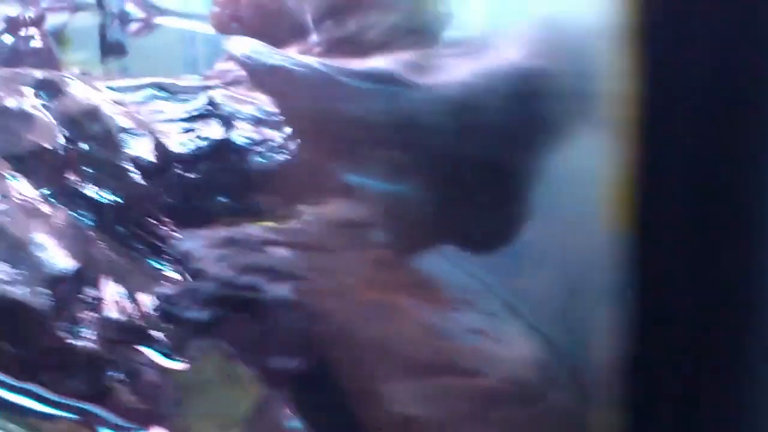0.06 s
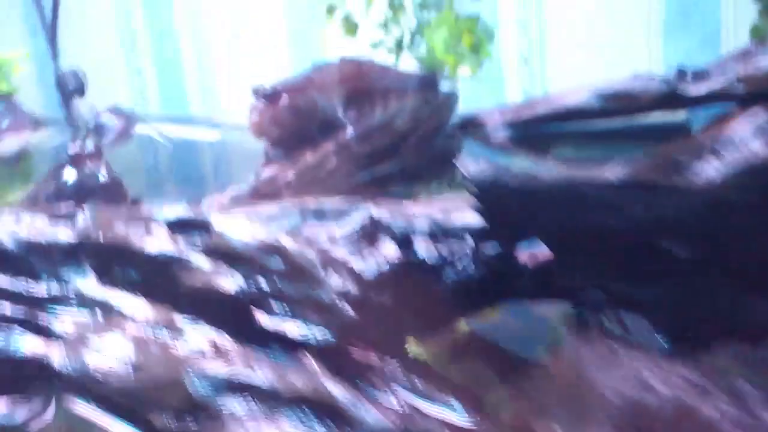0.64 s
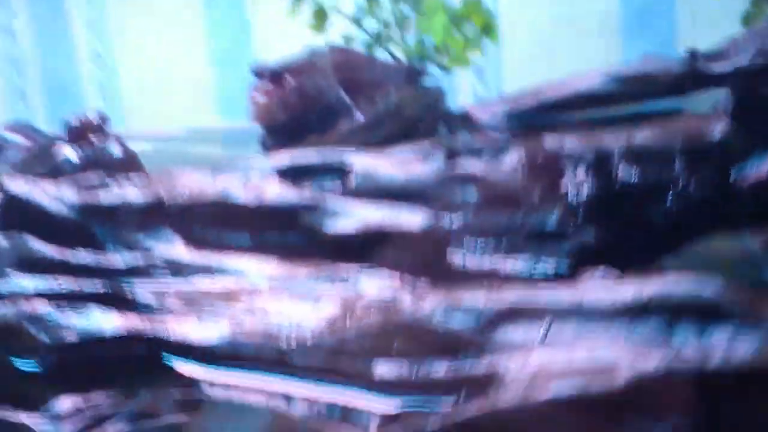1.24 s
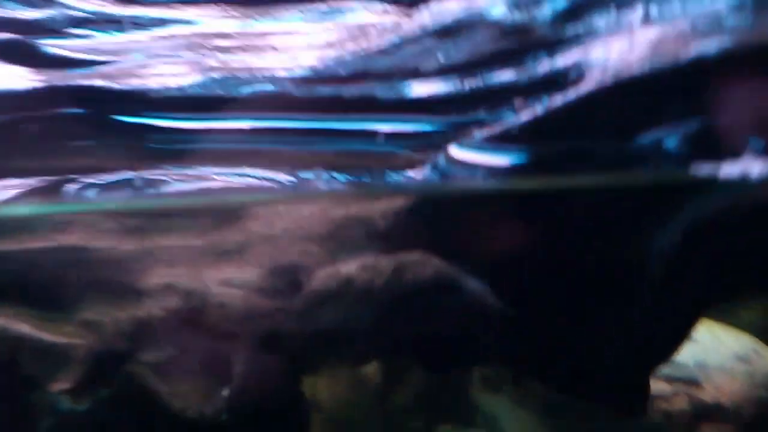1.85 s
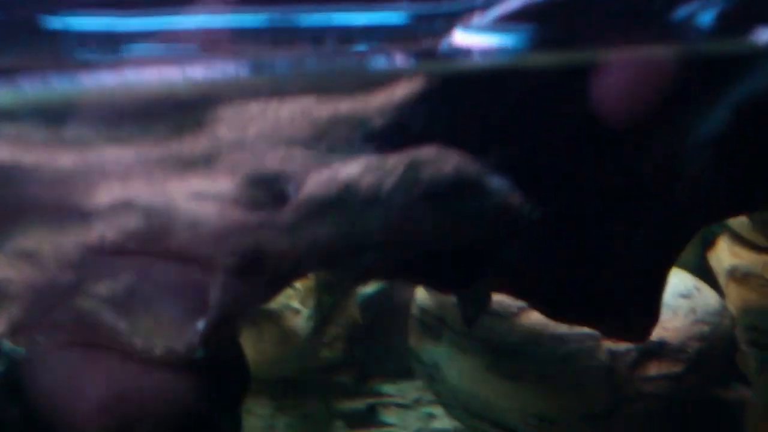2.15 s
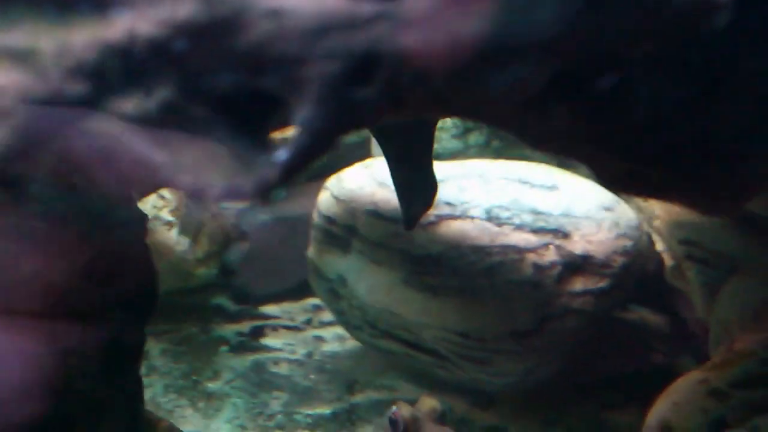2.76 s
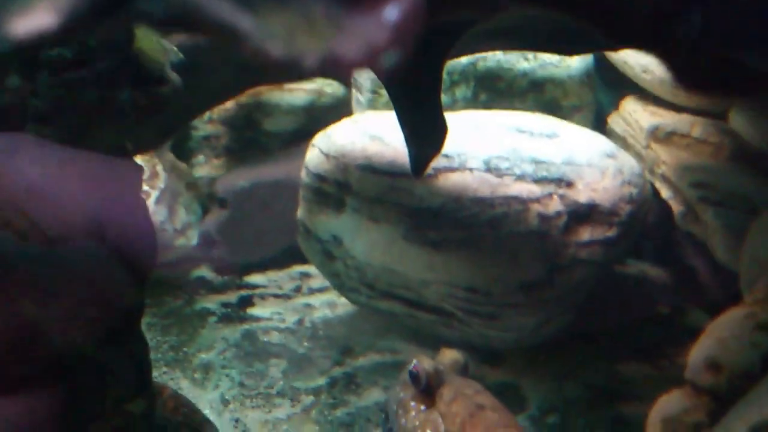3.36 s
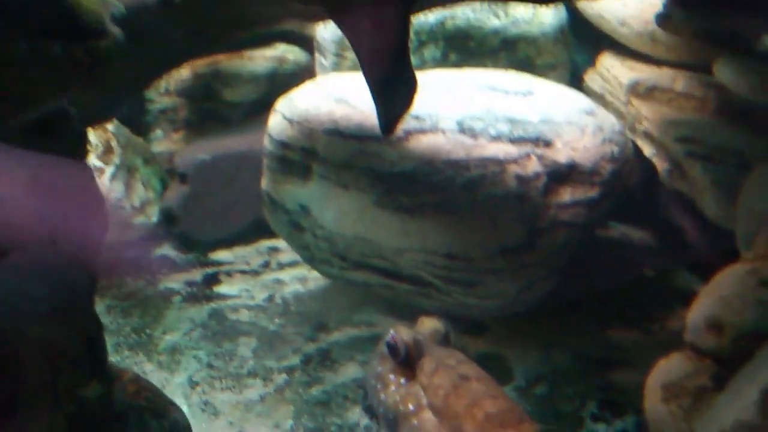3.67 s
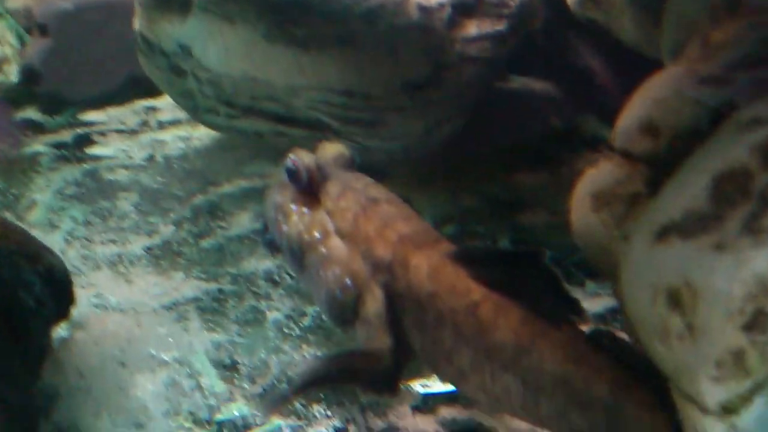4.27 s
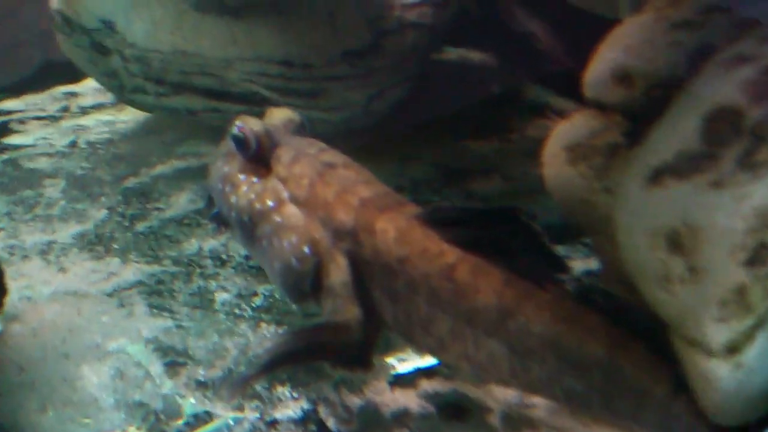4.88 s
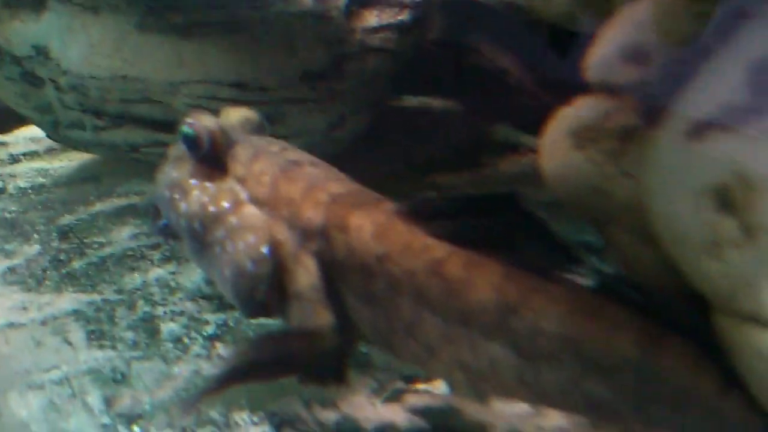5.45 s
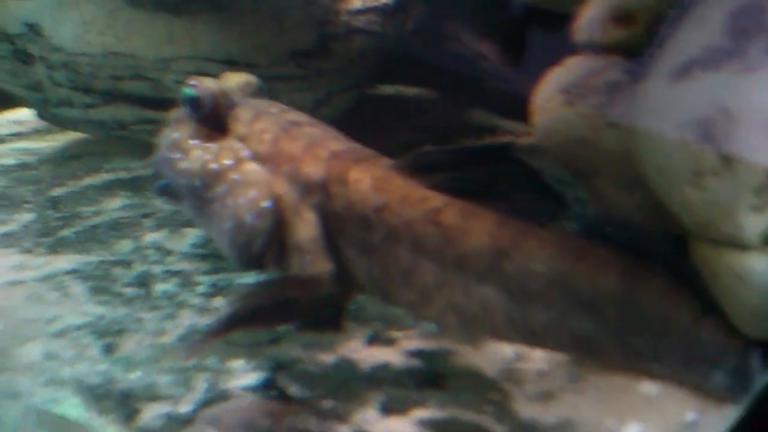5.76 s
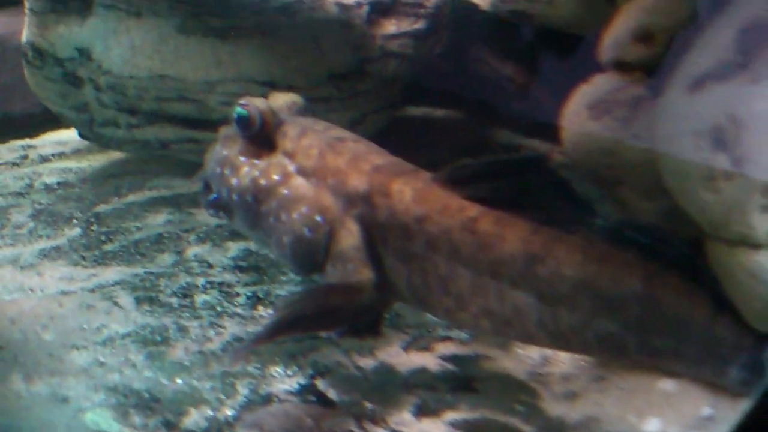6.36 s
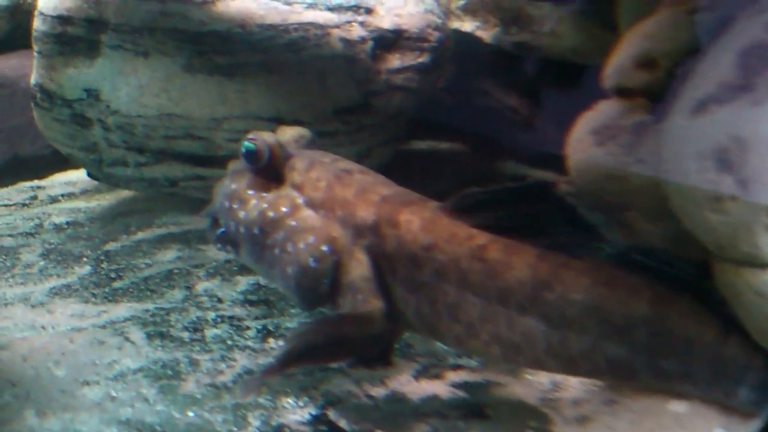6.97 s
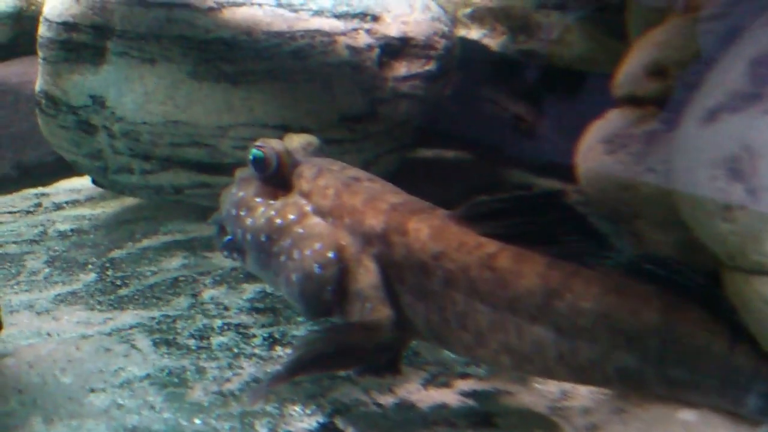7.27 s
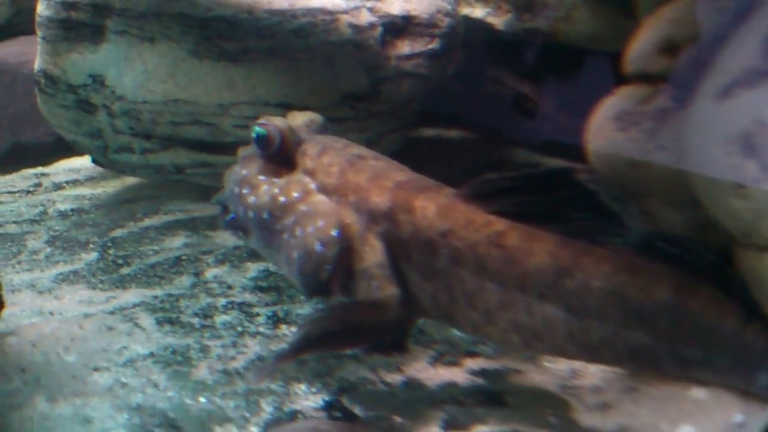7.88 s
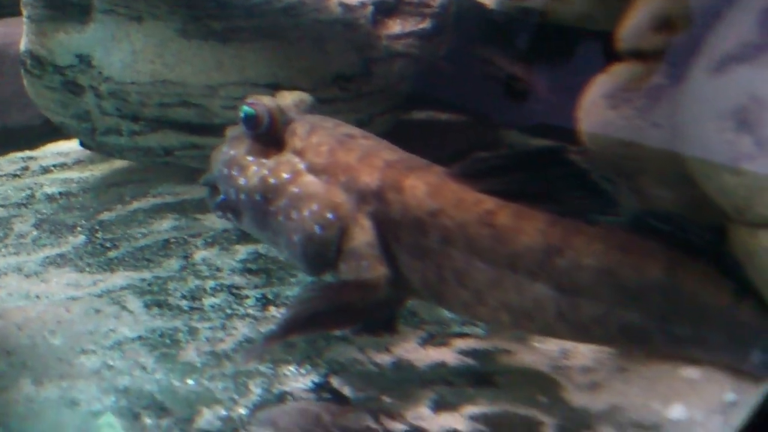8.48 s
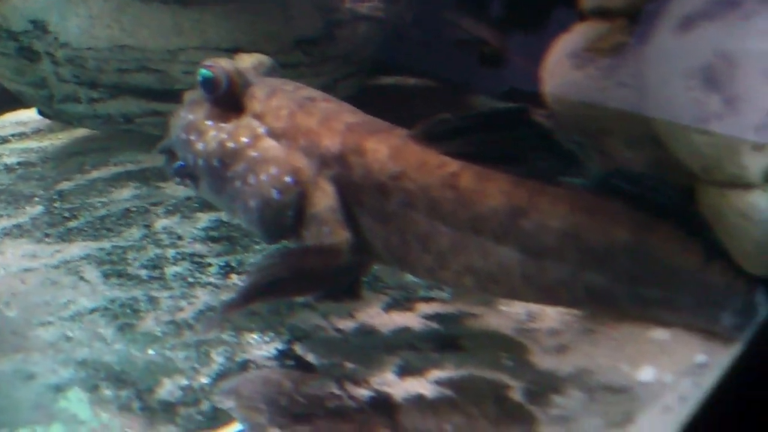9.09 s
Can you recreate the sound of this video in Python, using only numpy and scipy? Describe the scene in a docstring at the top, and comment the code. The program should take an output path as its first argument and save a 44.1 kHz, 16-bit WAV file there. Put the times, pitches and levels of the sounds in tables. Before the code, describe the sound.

A low, quiet aquarium pump hum and a soft rush run throughout in a quiet room, heard from a hand-held camera. Their tone shifts gradually until about 5.5 seconds as the microphones move from the tank's rim to the glass. A thin whine swells and fades at the start, near 5 seconds and near 8. The camera's motors add a faint high whirr over steady hiss. Tiny plastic ticks are scattered all along, mostly on the left, with a sharper click at 1.4 seconds and brief finger rubs and snaps near 0.2, 1.4 and 2.4. A rub and three light, dull bumps come between 4.4 and 4.7 seconds. At about 5.1 one hard, dry knock hits the case close to the left microphone, by far the loudest sound. From 6.3 to 8 seconds the grip gives short, soft creaks, and the hum continues until about 9.

```python
"""A low pump hum and a soft rush in a quiet room, heard from a hand-held camera at an aquarium's rim.
As the microphones move down to the glass, each multiple of the mains fades or grows with its standing
wave. A thin whine swells and fades three times. The camera's own motors whirr faintly throughout.
Fingers tick, rub and creak on the case; at about 5 s it knocks hard, close to the left microphone."""
import sys
import numpy as np
from scipy import signal
from scipy.fft import rfft, irfft
from scipy.io import wavfile
from scipy.ndimage import uniform_filter1d, map_coordinates

SR = 44100
rng = np.random.default_rng(int(sys.argv[2]) if len(sys.argv) > 2 else 0)


def transcribe(signal):
    """Save signal, clipped to [-1, 1], as a 16-bit WAV file at the path in sys.argv[1]."""
    frames = np.atleast_2d(signal).T
    limited = np.clip(frames, -1, 1)
    pcm = np.round(limited * 32767).astype(np.int16)
    wavfile.write(sys.argv[1], SR, pcm)


N = 407043
T = np.arange(N) / SR
MAINS_HZ, SOUND_M_S, TOP_HZ = 49.98, 343, 15800

# The microphones' path from rim to glass. Each row: time in seconds, place in metres.
MIC_PATH = [(0, 0), (1.5, 0.03), (3.2, 0.047), (5.6, 0.12), (9.2, 0.12)]
# The pump's standing waves. Each row: multiple of the mains, crest level in dB, place of a node in
# metres, left minus right in dB.
HUM_WAVES = [(2, -65, 0.42, 3.5), (3, -62.5, -0.43, 2.5), (4, -62, -0.0038, 9), (5, -72.5, -0.15, 5),
             (6, -63, 0.12, -1.5), (7, -62, 0.051, 6.5), (8, -68, 0.019, 3.5), (9, -79, 0.15, 3),
             (10, -79.5, -.09, 9), (11, -74, 0.15, 1), (12, -73.5, 0.22, 5), (13, -78.5, 0.14, 16),
             (14, -78, 0.033, 0), (15, -75, 0.038, 5), (16, -74.5, 0.021, 7.5), (17, -80, 0.071, 5),
             (20, -87.5, 0.013, 3), (21, -84, 0.051, 1), (23, -82, 0.1, -1.5), (25, -82.5, 0.042, 5),
             (26, -88, 0.133, 2), (27, -85.5, 0.091, 3)]
# Tones of the pump housing. Each row: multiple of the mains, left and right level in dB.
WHINE_TONES = [(32, -83.5, -86), (33, -81, -76.5), (35, -91, -87)]
# Resonances. Each row: centre in Hz, width in Hz, left and right level in dB, throb depth from 0 to 1.
PUMP_HOUSING = [(1610, 110, -78, -78, 1)]
MOTOR_BANDS = [(6410, 400, -74.5, -77, 0.27), (9750, 390, -78, -93, 0.6), (8800, 3700, -73, -92, 0.8)]
FOCUS_BANDS = [(354, 130, -73, -70.5, 0.98), (2630, 670, -69, -72, 0.42), (5720, 220, -88, -77, .3),
               (8780, 170, -78.5, -98, .6)]
FOCUS_WHISTLE = [(6200, 130, -84, -77, 0.2)]
# Smooth swells and dips. Each row: centre in seconds, width in seconds, gain in dB.
WHINE_SWELLS = [(.3, 1.1, 3.5), (4.8, 1.35, 3), (8.1, 1.6, -0.5)]
RUSH_SWELLS = [(2.85, 0.27, 0.5), (3.55, 0.12, 0.8), (6.52, 0.2, 3)]
WHIRR_SWELLS = [(1.7, .22, -1.5), (4.35, .45, 2), (5.2, .1, -2), (5.95, .2, 1)]
# Colours of the noises. Each row: frequency in Hz, relative level in dB.
RIM_COLOUR = [(20, 0.5), (70, 3.5), (140, -1.5), (230, 0.5), (330, 0.5), (410, -8), (620, -7), (760, -12.5),
              (900, -10), (1150, -12.5), (1500, -12), (2600, -19), (5000, -29)]
GLASS_COLOUR = [(20, 2), (70, 2.5), (160, 0), (340, 2), (520, -4), (780, -8.5), (1150, -10.5),
                (1420, -15.5), (1680, -14.5), (2600, -15), (5000, -37)]
HISS_COLOUR = [(100, 13), (2000, 0), (4500, 3), (8000, 1.5), (12000, -1), (16000, -2)]
RUB_LEFT_COLOUR = [(500, -15), (2600, -4), (3600, -5.5), (5000, 0), (6200, 2), (8200, -3), (9200, 4.5),
                   (10100, 5), (11200, -3), (12200, -7), (14000, -7), (15500, -17)]
RUB_RIGHT_COLOUR = [(500, -30), (1500, 9), (2500, 3), (3800, 9), (5200, 16), (6500, 5), (7800, -3),
                    (15500, -6)]
CHATTER_COLOUR = [(500, 0), (2500, 2), (6000, -2), (9000, 2), (12000, -2), (15500, -1)]
# Balance of the rush at each place. Each row: frequency in Hz, left minus right in dB.
RIM_BALANCE = [(60, 1), (300, -1), (480, 2), (700, -3), (1000, 2), (4000, -3.5)]
GLASS_BALANCE = [(60, -1), (250, 2), (450, 7), (850, 1), (1200, 6), (1700, -3.5), (2500, 3), (4000, -9)]
# How alike the rush is at the two microphones. Each row: frequency in Hz, coherence from 0 to 1.
RUSH_COHERENCE = [(30, 0.34), (130, 0.7), (300, 0.83), (640, 0.67), (1400, 0), (3000, 0.08)]
# The camera motor's speed. Each row: time in seconds, pitch in Hz (used relative to its mean).
WHIRR_PITCH = [(0, 6330), (1.1, 6290), (1.25, 6550), (1.5, 6340), (2.8, 6330), (3.2, 6440), (4.9, 6380),
               (5.4, 6480), (9.2, 6430)]
# Modes of the camera's body. Each row: frequency in Hz, t60 in seconds, left and right gain in dB.
TICK_MODES = [(3400, 0.0045, -13, -32), (5600, 0.0032, -21, -30), (8100, 0.004, -11, -42),
              (9400, 0.004, 3.5, -42), (10500, 0.0036, -4, -42)]
SEAM_MODES = [(1380, 0.009, -6, -9), (3080, 0.0073, -9, -11), (3660, .01, -8, -8), (4320, 0.0082, -5, -9),
              (6440, 0.0065, -13, -7), (9700, .005, 5, -25)]
CASE_MODES = [(131, 0.1, -34, -30), (193, 0.073, -23, -40), (253, 0.094, -23, -40), (355, 0.019, -12, -38),
              (491, 0.027, -12, -36), (602, 0.025, -10.5, -20), (904, 0.0087, -10.5, -24),
              (1150, 0.0093, -13.5, -28), (1377, 0.021, -23, -20.5), (2070, 0.013, -8.5, -11.5),
              (2580, 0.0058, -6, -24), (3900, 0.005, -3.5, -15), (4600, 0.0055, -10.5, -13),
              (5410, 0.005, -11, -11), (6200, 0.0058, -20, -13.5), (6900, 0.0065, -10, -33.7),
              (7970, 0.0033, -0.7, -35.2), (9050, 0.0054, -2, -32.4), (9800, 0.0036, -3.5, -28.4),
              (11200, 0.0061, -7.5, -29.9), (12050, 0.004, -11, -22.5), (14552, 0.0034, -7, -24)]
GRIP_MODES = [(330, 0.011, -6, -12), (780, 0.013, -3.5, -36), (1030, 0.0093, -2, -23),
              (2020, 0.0035, -1, -10), (3000, .004, -17, -13)]
# Clear plastic ticks. Each row: start in seconds, gain in dB.
CLEAR_TICKS = [(0.074, -47), (1.035, -47), (1.3570, -21), (1.3578, -38), (2.232, -46), (2.2588, -41),
               (2.318, -44), (2.961, -48), (4.243, -48), (4.3735, -47), (4.458, -40), (4.875, -47),
               (6.1567, -44), (6.797, -46), (7.439, -47), (8.081, -47), (8.134, -47), (8.7229, -45)]
# Finger rubs. Each row: start in seconds, length in seconds, gain in dB, tilt in dB per octave.
FINGER_RUBS = [(0.179, 0.021, -51, 4), (0.371, 0.39, -64, -2.5), (1.383, 0.084, -59.5, 12),
               (1.422, 0.034, -55.5, 13), (2.29, .13, -61.5, 3), (2.391, 0.031, -54.5, 2),
               (2.798, .014, -57.5, -3), (4.38, 0.093, -50.5, -1), (5.505, 0.44, -65, 7)]
# Snaps and creaks. Each row: start in seconds, gain in dB, hardness as a low-pass cutoff in Hz.
SEAM_SNAPS = [(.1822, -41, 14000), (.189, -52, 12000), (1.4474, -39.5, 2800), (2.414, -38.5, 2200)]
GRIP_CREAKS = [(4.543, -39.5, 1500), (4.664, -39, 2400), (4.7258, -39, 2800), (6.3589, -34.5, 4200),
               (6.5635, -40, 1300), (6.6553, -39.5, 1300), (6.7845, -37, 1700), (7.008, -39.5, 2000),
               (7.1547, -37.5, 1500), (7.613, -39, 1400), (7.6362, -41, 1200), (7.944, -36.5, 2600),
               (7.994, -40, 1700), (8.002, -42, 1900)]
# Blows on the case. Each row: start in seconds, gain in dB, extra on the right in dB, low-pass in Hz.
CASE_BLOWS = [(1.3572, -42, -2, 700), (4.543, -37, 7, 14000), (4.5436, -33, 13, 450),
              (4.6645, -28.5, 3, 650), (4.7258, -29, 3, 750), (5.1489, 1.5, -6, 15500),
              (5.1513, -20.5, 3, 12000), (5.1551, -7.5, -6.5, 320), (5.1551, -25, -9, 3500)]


def undb(db):
    """Decibels to gain."""
    return 10 ** (np.asarray(db) / 20)


def curve(rows):
    """Rows of seconds and value, joined by straight lines."""
    return np.interp(T, *np.transpose(rows))


def across(rows):
    """Rows of Hz and value, joined on a log-frequency axis for every bin."""
    hz, value = np.transpose(rows)
    return np.interp(np.log(np.arange(N // 2 + 1) * SR / N + 1), np.log(hz), value)


def unit(x):
    """Scale to rms 1."""
    return x / np.sqrt(np.mean(x ** 2))


def noise(gain):
    """Noise of rms 1, shaped by a gain for every bin."""
    return unit(irfft(rfft(rng.standard_normal(N)) * gain, N))


def walk(rate):
    """Random levels held 1 / rate seconds and smoothed twice; spread near 1."""
    hold = int(SR / rate)
    steps = np.repeat(rng.standard_normal(N // hold + 1), hold)
    return 1.3 * uniform_filter1d(uniform_filter1d(steps, hold), hold)[:N]


def bump(s, width_s):
    """A smooth rise and fall, 1 at time s."""
    return np.exp(-((T - s) / width_s) ** 2)


def cut(x, hz, kind):
    """Two-pole low-pass or high-pass."""
    return signal.sosfilt(signal.butter(2, hz, kind, fs=SR, output="sos"), x)


def add(out, s, sound):
    """Mix a short stereo sound in at time s."""
    start = int(s * SR)
    out[:, start:start + sound.shape[1]] += sound[:, :N - start]


def pump_hum(place_m, node_db=-29, sway_db=0.9, rattle_db=2.0, jitter_s=6e-5, skew_rad=0.31):
    """Mains harmonics stand in the room; each fades as the microphones near one of its nodes."""
    out = np.zeros((2, N))
    for multiple, crest_db, node_m, balance_db in HUM_WAVES:
        hz = multiple * MAINS_HZ
        wave = np.sin(2 * np.pi * hz * (place_m - node_m) / SOUND_M_S)
        level = undb(crest_db) * np.hypot(wave, undb(node_db))
        level *= undb(sway_db * np.sqrt(hz / 400) * walk(2.01))  # the hand sways; short waves vary most
        level *= undb(rattle_db * hz / 800 * walk(18))  # uneven rattle roughens the high harmonics
        phase = 2 * np.pi * (hz * (T + jitter_s * walk(25)) + rng.random())
        out[0] += level * undb(balance_db / 2) * np.cos(phase + skew_rad * rng.standard_normal())
        out[1] += level * undb(-balance_db / 2) * np.cos(phase)
    return np.sqrt(2) * out


def whirr(resonances, speed=1, drift=0.007, drift_rate=3.0, throb_hz=50, flutter_db=1.3):
    """A small motor's noise in the resonances of its housing, throbbing and wavering in pitch."""
    out, bin_hz = 0, np.arange(N // 2 + 1) * SR / N
    beat = np.cos(2 * np.pi * throb_hz * T)
    position = np.cumsum(speed + drift * walk(drift_rate))  # noise read faster sounds higher
    for hz, width, left, right, throb in resonances:
        shape = 1 / (1 + ((bin_hz - hz) / (width / np.sqrt(2))) ** 2)
        band = np.array([map_coordinates(noise(shape), [position], mode="mirror") for _ in range(2)])
        flutter = undb(flutter_db * walk(25))
        out += undb([[left], [right]]) * unit(band * (1 + throb * beat)) * flutter
    return out


def pump_whine():
    """Mains harmonics sing in the pump housing; the thin whine swells and fades three times."""
    tones = 0
    for multiple, left, right in WHINE_TONES:
        phase = 2 * np.pi * (multiple * MAINS_HZ * T + rng.random((2, 1)))
        tones += undb([[left], [right]]) * np.cos(phase)
    swell = sum(undb(db) * bump(s, width_s) for s, width_s, db in WHINE_SWELLS)
    return swell * (np.sqrt(2) * tones + whirr(PUMP_HOUSING, drift=0.00417))


def rush(colour, balance, flutter_db=0.5):
    """Broad noise of running equipment at one spot; its long waves reach both microphones much alike."""
    coherence = across(RUSH_COHERENCE)
    common, left, right = rfft(rng.standard_normal((3, N)))
    pair = np.sqrt(coherence) * common + np.sqrt(1 - coherence) * np.array([left, right])
    gain = undb(across(colour) + np.array([[1], [-1]]) * across(balance) / 2)
    return unit(irfft(pair * gain, N)) * undb(flutter_db * walk(5.4))


def room_rush(place_m, rim_m=0.023, glass_m=0.118, rim_db=-61, glass_db=-58.5):
    """The rush changes colour on the way from the rim to the glass, with a few brief swells."""
    near_glass = np.clip((place_m - rim_m) / (glass_m - rim_m), 0, 1)
    at_rim = np.sqrt(1 - near_glass) * undb(rim_db) * rush(RIM_COLOUR, RIM_BALANCE)
    at_glass = np.sqrt(near_glass) * undb(glass_db) * rush(GLASS_COLOUR, GLASS_BALANCE)
    swell_db = sum(db * bump(s, width_s) for s, width_s, db in RUSH_SWELLS)
    return undb(swell_db) * (at_rim + at_glass)


def microphone_hiss(level_db=-64):
    """Each microphone adds its own steady noise."""
    return undb(level_db) * np.array([noise(undb(across(HISS_COLOUR))) for _ in range(2)])


def camera_motor(base_db=1.5, start_db=9.5, settle_s=0.13, fade_db_per_s=0.1, wander_db=0.5):
    """The camera's motor starts loud and settles; its pitch follows its speed."""
    gain_db = base_db + start_db * np.exp(-T / settle_s) - fade_db_per_s * T + wander_db * walk(7)
    gain_db += sum(db * bump(s, width_s) for s, width_s, db in WHIRR_SWELLS)
    pitch = curve(WHIRR_PITCH)
    return undb(gain_db) * whirr(MOTOR_BANDS, speed=pitch / pitch.mean(), drift=0.014, drift_rate=9)


def focus_motor(runs_s=((0, 0.99), (5.3, 11)), idle_db=-6, rise_db=3, ramp_s=0.15):
    """The focus motor rises from idle for each run and whistles faintly on the first."""
    runs = [np.clip(np.minimum(T - start, end - T) / ramp_s + 1, 0, 1) for start, end in runs_s]
    gain = undb(idle_db + rise_db * sum(runs))
    return gain * whirr(FOCUS_BANDS) + runs[0] * whirr(FOCUS_WHISTLE, drift=0.005)


def ring(modes, scatter, lag_s=0.000697):
    """Damped modes of the camera's body after one push, detuned by where the push lands."""
    detunes = 1 + scatter * rng.standard_normal(len(modes))
    out = 0
    for (hz, t60, left, right), detune in zip(modes, detunes):
        # the bending wave reaches the right microphone late, its low notes last
        late_s = lag_s * np.sqrt(2000 / hz)
        t = np.maximum(T[:SR // 5] - np.array([[0], [late_s]]), 0)
        decay = np.exp(-np.log(1000) * t / t60)
        out += undb([[left], [right]]) * np.sin(2 * np.pi * hz * detune * t) * decay
    return out


def plastic_ticks(faint_count=30, faint_db=-54, spread_db=1.5):
    """The plastic ticks sharply by the left microphone; faint ticks fall at random among clear ones."""
    out = np.zeros((2, N))
    faint = [(rng.uniform(0, T[-1]), rng.normal(faint_db, spread_db)) for _ in range(faint_count)]
    for s, db in list(CLEAR_TICKS) + faint:
        tick = cut(ring(TICK_MODES, scatter=0.015), 4000, "high")
        add(out, s, undb(db) * cut(tick, 11800, "low"))
    return out


def finger_rubs(right_db=-13, pivot_hz=9000, grain_db=1.6):
    """Skin slides over the case by the left microphone, with a fine grain."""
    out = np.zeros((2, N))
    left = noise(undb(across(RUB_LEFT_COLOUR)))
    right = undb(right_db) * noise(undb(across(RUB_RIGHT_COLOUR)))
    friction = rfft([left[:SR], right[:SR]])
    octaves = np.log2(np.arange(1, SR // 2 + 2) / pivot_hz)
    for s, length_s, db, tilt_db in FINGER_RUBS:
        pressure = np.sqrt(np.abs(np.sin(np.pi * np.clip(T[:SR] / length_s, 0, 1))))
        slide = irfft(friction * undb(tilt_db * octaves), SR)
        add(out, s, undb(db) * pressure * np.roll(slide, rng.integers(SR), axis=1))
    return out * undb(grain_db * walk(900))


def seam_snaps():
    """A seam of the case snaps and rings briefly."""
    out = np.zeros((2, N))
    for s, db, hard_hz in SEAM_SNAPS:
        add(out, s, undb(db) * cut(ring(SEAM_MODES, scatter=0.031), hard_hz, "low"))
    return out


def case_knocks(chatter_db=(-15.5, -28), chatter_s=0.0026, push_s=0.00032, light_below_db=-30):
    """A blow rings the case while the contact chatters; a soft contact leaves only the thud."""
    out, t = np.zeros((2, N)), T[:SR // 5]
    chatter = np.array([undb(db) * noise(undb(across(CHATTER_COLOUR)))[:len(t)] for db in chatter_db])
    chatter *= np.exp(-t / chatter_s)
    attack = 1 - np.exp(-t / push_s)
    for s, db, right_db, hard_hz in CASE_BLOWS:
        scatter = 0.066 if db < light_below_db else 0  # light taps land on different spots
        blow = (ring(CASE_MODES, scatter) + chatter) * attack
        blow = cut(blow, 72, "high") + room_tail()  # the knock carries little deep bass
        add(out, s, undb([[db], [db + right_db]]) * cut(blow, hard_hz, "low"))
    return out


def room_tail(tail_db=-51, t60_s=0.16, low_hz=450, high_hz=2600):
    """The room's short, dull answer to a knock."""
    t = T[:SR // 5]
    wash = cut(cut(rng.standard_normal((2, len(t))), low_hz, "high"), high_hz, "low")
    return undb(tail_db) * unit(wash) * np.exp(-np.log(1000) * t / t60_s)


def grip_creaks():
    """The grip gives under the fingers in short, dull creaks."""
    out = np.zeros((2, N))
    for s, db, hard_hz in GRIP_CREAKS:
        creak = cut(ring(GRIP_MODES, scatter=0.038), 250, "high")
        add(out, s, undb(db) * cut(creak, hard_hz, "low"))
    return out


def scene():
    """Hum and rush follow the microphones' place; the camera's own sounds stay close."""
    place_m = curve(MIC_PATH)
    room = pump_hum(place_m) + pump_whine() + room_rush(place_m)
    camera = microphone_hiss() + camera_motor() + focus_motor()
    handling = plastic_ticks() + finger_rubs() + seam_snaps() + case_knocks() + grip_creaks()
    return room + camera + handling


def record(dry):
    """The camera rounds the loudest peak and cuts the top."""
    return signal.sosfilt(signal.ellip(10, 0.1, 70, TOP_HZ, fs=SR, output="sos"), np.tanh(dry))


dry = scene()
out = record(dry)
transcribe(out)
```